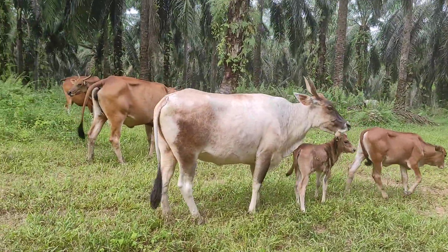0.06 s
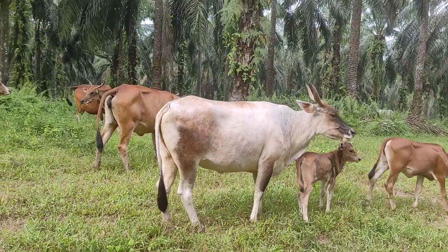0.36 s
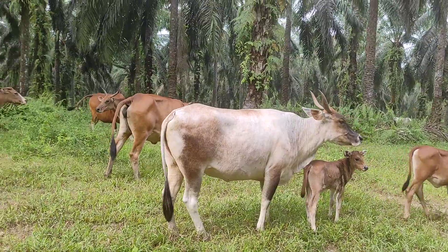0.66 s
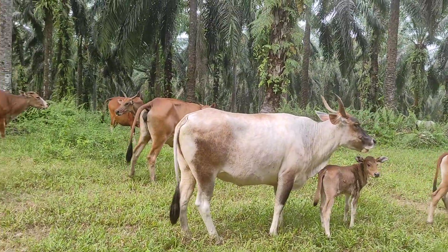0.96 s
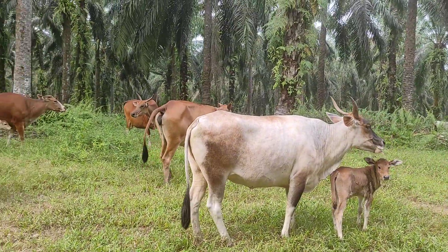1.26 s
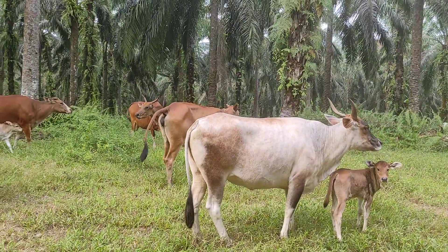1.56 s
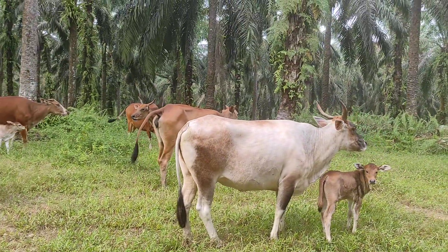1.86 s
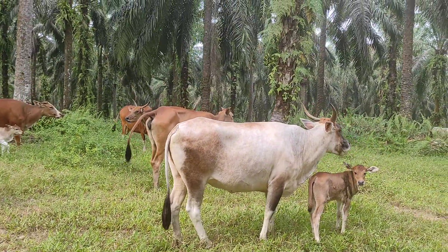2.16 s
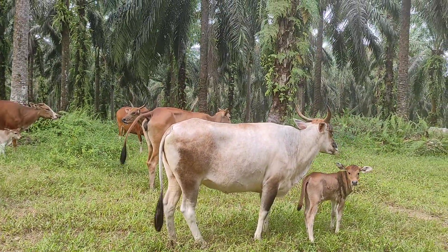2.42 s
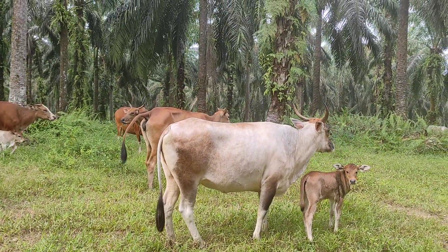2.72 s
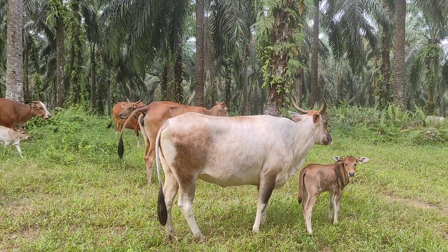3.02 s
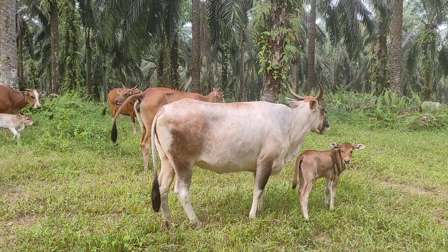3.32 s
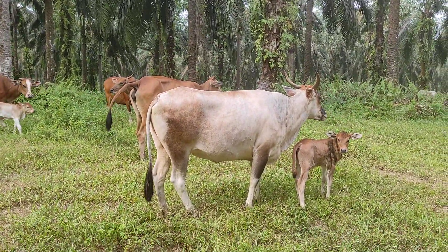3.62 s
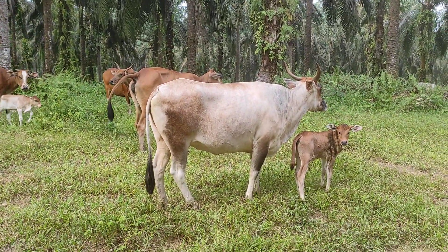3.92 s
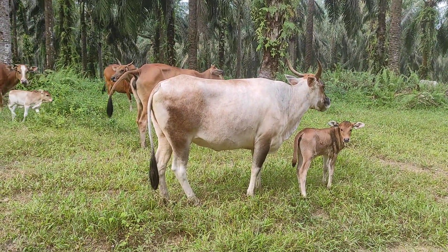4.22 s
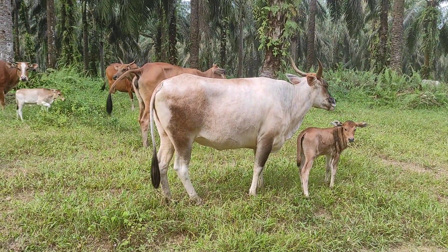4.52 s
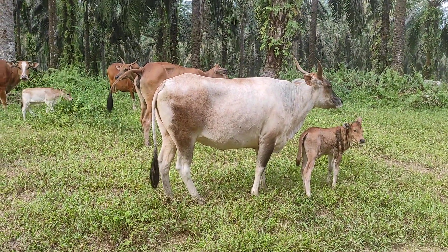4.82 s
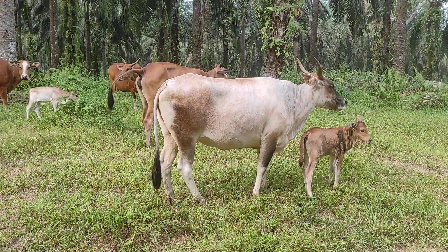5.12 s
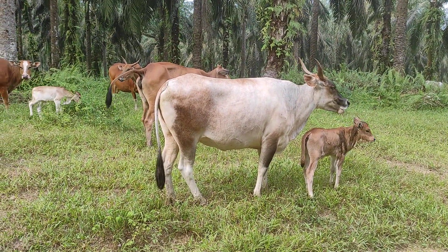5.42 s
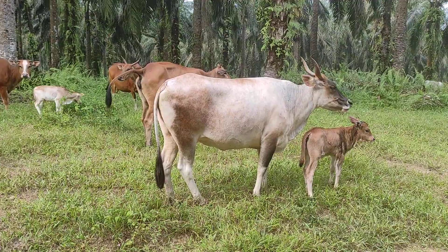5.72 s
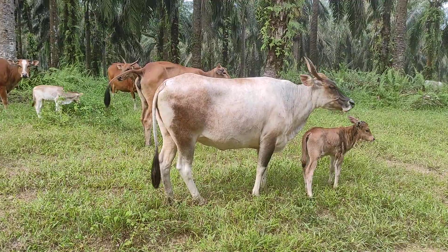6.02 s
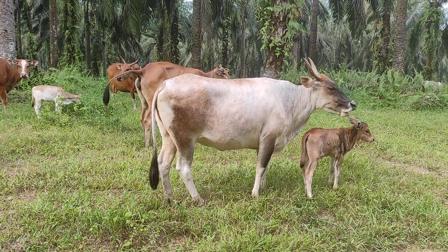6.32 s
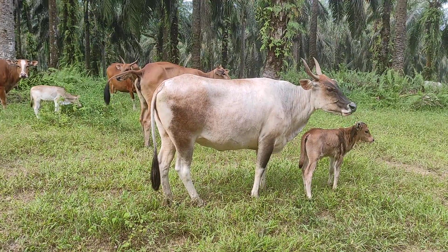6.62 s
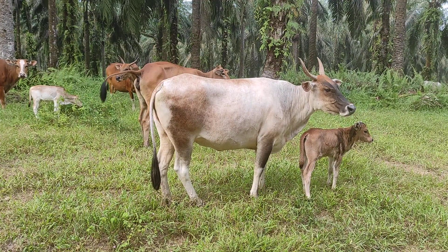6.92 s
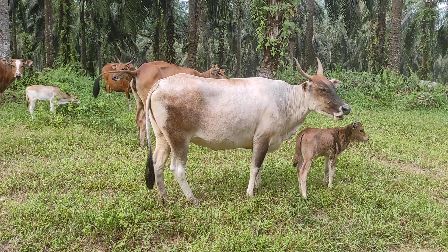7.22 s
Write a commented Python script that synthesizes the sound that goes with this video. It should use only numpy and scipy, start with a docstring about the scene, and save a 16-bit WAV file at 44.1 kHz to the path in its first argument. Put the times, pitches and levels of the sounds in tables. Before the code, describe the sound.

Hooves crunch through grass and a nearby cow lows once, then a faint distant animal answers over steady insects and birds.

```python
"""A cow lows close by: its vocal folds snap shut over and over, first humming through the nose, then ringing in
the open mouth for a long call that sinks into a creak. Around it, in a grassy clearing among palms, legs brush
the grass, hooves crush stems, the cow tears and chews grass, and there is one hollow thump. Far off another
animal answers. Insects shrill over a soft rumble, one bird calls at a steady pace and a farther one whistles.
The trunks send back an echo."""
import sys
import numpy as np
from scipy import signal
from scipy.fft import rfft, irfft, next_fast_len
from scipy.io import wavfile
from scipy.ndimage import uniform_filter1d, map_coordinates

SR = 44100
rng = np.random.default_rng(int(sys.argv[2]) if len(sys.argv) > 2 else 0)


def generate_wav(sig):
    """Save sig (samples, or channels by samples) to the path in sys.argv[1] as 16-bit PCM at SR."""
    pcm = np.round(np.clip(np.atleast_2d(sig).T, -1, 1) * 32767).astype(np.int16)
    wavfile.write(sys.argv[1], SR, pcm)


N = 325017
T = np.arange(N) / SR
SIZE = 2 * next_fast_len(N // 2 + SR // 2)      # leaves room for echoes
HZ = np.maximum(np.arange(SIZE // 2 + 1) * SR / SIZE, 1)

# how alike left and right are in spread-out noise: f/Hz, likeness (1 = the same)
STEREO_LIKENESS = [(60, 0.93), (250, 0.69), (1000, 0), (2500, 0), (5000, 0.017), (15000, 0)]
# tone colour of the outdoor rumble: f/Hz, level/dB
AIR_COLOUR = [(25, -2), (60, -2), (118, -7.5), (169, -1.5), (230, -7.5), (480, -15), (700, -17),
              (1270, -21), (2200, -17), (2900, -23.5), (4000, -23.5)]
# bands in which the insects shrill: f/Hz, width/Hz, level/dB, left minus right/dB
INSECT_BANDS = [(4650, 510, 7.5, -1.5), (5535, 880, 5.5, -5.5), (6740, 510, 4.5, -10.5),
                (7170, 930, -1.5, -13.5), (8580, 1080, -2, 18), (10850, 530, -11, -4),
                (13800, 1900, -21, -10)]
# legs sweeping through grass: t/s of the peak, half length/s, level/dB
LEG_SWEEPS = [(0.022, 0.012, -44.5), (0.082, 0.039, -48), (0.124, 0.034, -44.5), (0.31, 0.38, -50),
              (0.475, 0.031, -43), (0.63, 0.19, -50.5), (0.95, 0.11, -54), (1.134, 0.091, -48.5),
              (1.23, 0.025, -49), (1.303, 0.11, -50), (1.625, 0.5, -53.5), (1.966, 0.059, -48.5),
              (3.853, 0.13, -55), (4.223, 0.17, -54), (4.707, 0.12, -57.5), (5.1, 0.092, -58),
              (5.46, 0.11, -52.5), (7.015, 0.04, -57.5), (7.115, 0.043, -55)]
# tone colours of brushed grass and of breaking stems: f/Hz, level/dB
BLADE_COLOUR = [(200, -30), (500, -6), (1200, -6), (2400, -2), (3700, -5), (5000, -5.5), (7200, 7.5),
                (8900, 4), (9800, -8), (15500, -17)]
STEM_COLOUR = [(150, 16.5), (500, 19.5), (1000, 10), (2500, 9.5), (3800, -8), (5200, -4), (8000, 0.5),
               (10000, -16), (15500, -51)]
# hooves crushing stems, and from 3.8 s on mostly the cow tearing and chewing grass: t/s of the peak, fade/s,
# level/dB, treble tilt/(dB per octave), stem ring f/Hz
CRUNCHES = [(0.357, 0.0045, -46, 5.5, 2120), (.44, 0.0035, -53, 6, 1000), (.458, 0.01, -45, -0.5, 840),
            (0.478, 0.0039, -44.5, 2.5, 980), (0.488, 0.0058, -38, 4.5, 2630),
            (0.5403, 0.0022, -42, 5, 2100), (.552, 0.0025, -46.5, 1, 1300),
            (.557, 0.0022, -42.5, 3.5, 1210), (0.681, 0.0045, -49.5, 4, 1800),
            (0.919, 0.0045, -48, 7.5, 1980), (1.024, 0.004, -50.5, -1.5, 790),
            (1.102, 0.0041, -44, 1, 2260), (1.139, 0.0036, -42.5, 14, 3100),
            (1.275, 0.004, -42, 10, 7000), (1.32, 0.0038, -37.5, 5.5, 1250),
            (1.384, 0.0047, -50.5, 3.5, 1000), (1.58, 0.0043, -56, 3, 1490),
            (3.254, 0.0019, -34.5, 3, 2012), (3.845, .004, -51, 3, 2300), (4.096, 0.0035, -42, 8.5, 1696),
            (4.132, 0.012, -53, 5, 1970), (4.206, 0.0015, -42.5, 11, 2820),
            (4.254, 0.0042, -49.5, 1.5, 2400), (4.306, 0.0017, -50, 4, 2880),
            (4.404, 0.0057, -47.5, 5, 1680), (5.013, .003, -53, 3, 2000), (5.517, 0.0047, -51.5, 2, 2100),
            (5.841, 0.003, -51, 4.5, 1785), (6.196, .002, -51, 3.5, 1800),
            (6.84, 0.0026, -49, -1.5, 1500), (7.24, 0.0049, -52, 5, 2040)]
# dry stems cracking: t/s, level/dB before the tone is shaped
STEM_CRACKS = [(.3565, -38), (.459, -33), (.4875, -33), (.5145, -31), (1.1375, -35), (1.141, -36),
               (1.3205, -36), (4.0945, -39), (4.2055, -36), (5.4227, -38)]
# dull knocks: t/s, level/dB, f/Hz, fade/s, extra pitch at the start as a multiple of f
DULL_KNOCKS = [(.5145, -34.5, 800, .007, 3.2), (.6045, -38, 410, .014, 2.2), (.797, -51, 180, .07, 2),
               (1.317, -38.5, 480, .018, 2.2), (5.4238, -29.5, 290, .013, 1.1)]
# the cow's pitch, which stands for its effort and also steers its loudness: t/s, f/Hz
COW_PITCH = [(1.55, 72.5), (1.64, 78.2), (1.8, 86.47), (1.94, 88.3), (2.056, 87.86), (2.188, 85.57),
             (2.354, 84.9), (2.46, 85.96), (2.582, 83.5), (2.72, 82.9), (2.796, 80.75), (2.928, 78.87),
             (3.272, 66.98), (3.332, 63.68), (3.42, 58.76), (3.5, 46.42), (3.58, 39.98)]
# resonances (pitches at which the cow's airways ring): f/Hz, width/Hz, level/dB, left minus right/dB
NOSE_RESONANCES = [(88, 50, -6, 4), (170, 50, -4, 4), (470, 200, -9, 3), (700, 150, -13, 2),
                   (930, 130, -1.5, 0), (1160, 260, -4, -2), (2000, 200, -4, -3), (2380, 200, 0, -3),
                   (2790, 160, -1.5, -2), (3190, 150, -0.5, 0), (3740, 220, -10, 0), (4430, 220, -3.5, -2),
                   (4950, 400, -6, -4), (5400, 350, -7, -5), (6100, 420, -3.5, -6), (7050, 700, -5, -4),
                   (8500, 900, -12, 3)]
OPEN_MOUTH = [(91, 81, -18.5, 6), (204, 59, -9.5, 4), (390, 188, -17, 3.5), (792, 64.5, -2, -0.5),
              (910, 120, -13, 2), (1164, 153, 1.5, -1.5), (1318, 200, -1, -6), (1464, 126, 6.5, -4),
              (1640, 260, -4, -4), (2155, 420, -6.5, -7), (2397, 130, 0, -4.5), (2687, 64, -7.5, -11),
              (2813, 150, -2, 0.5), (3270, 310, -10, 1)]
NARROW_MOUTH = [(500, 180, -16.5, 5), (750, 62, -7, -2), (1210, 320, 1.5, -1), (1760, 130, -3, 0),
                (2114, 190, -8, -13), (2470, 310, -6.5, -5), (2850, 270, -6, 1)]
TIGHT_FOLD_RASP = [(4150, 450, -9, -1), (4880, 400, -6, -4), (5450, 420, -7, -9), (6200, 500, -13, -9),
                   (6900, 350, -4.5, -10), (7300, 400, 0, -10), (8130, 400, 1, 4), (8620, 480, -3, 11)]
SLACK_FOLD_RASP = [(3800, 600, -6, 6), (4930, 580, 3, -5), (5500, 470, 0, -10.5), (6150, 450, -1.5, -12),
                   (7100, 700, 1, -10), (7980, 600, 3.5, 12), (8750, 500, -0.5, -3), (10600, 1100, -9, 0)]
# how far the cow's sound wave is ahead on the right: f/Hz, lead/radians
RIGHT_LEAD = [(60, 0.04), (250, 0.39), (700, 0.97), (1500, 1.94), (2800, 1.41), (4000, 3.84), (6000, 3.97),
              (7500, 2.3), (8600, 2.22)]
# one bird call, never twice alike: t/s, relative chip level/dB, relative slur level/dB, fall/(Hz per s)
CHIP_CALLS = [(3.876, -56.5, -61.5, 2720), (4.452, -53, -63, 3300), (5.068, -52, -63, 2300),
              (5.672, -54.5, -63, 2210), (6.284, -54.5, -61.5, 2593)]
# the far answer: t/s of the middle, half length/s, top f/Hz, relative level/dB, hoarseness (0 to 1)
ANSWER_NOTES = [(4.24, 0.14, 626, -67, 0.31), (4.76, 0.39, 755, -64.5, 0.89)]
# the farther bird: t/s, half length/s, f/Hz, level/dB
FAR_WHISTLES = [(4.95, .07, 1940, -71), (5.56, .07, 2000, -68), (5.78, .06, 1970, -71),
                (6.1, .03, 2000, -64), (6.21, .03, 1920, -68), (6.6, .015, 1750, -67),
                (6.75, .015, 1780, -68), (6.82, .04, 1990, -67)]
# ringing tones of the hollow thump: f/Hz, level/dB, time to fade by 60 dB/s
THUMP_TONES = [(178, -36, .12), (210, -47, .24), (385, -46, .15), (580, -50, .13)]

# the course of the cow's call
HUM_STARTS_S, MOUTH_OPENS_S, SLACKENS_S, FULLY_SLACK_S = 1.53, 1.9995, 2.55, 3.33
MOUTH_NARROWS_S, RASP_ENDS_S, VOICE_ENDS_S, THROAT_ENDS_S = 3.44, 3.54, 3.592, 3.685
HUM_DB_PER_OCTAVE = 30      # with shut lips, the level climbs steeply with pitch


def from_db(db):
    """Turn decibels into a factor to multiply by."""
    return 10 ** (np.asarray(db) / 20)


def rms_one(x):
    """Scale a sound so that its average level (rms) is 1."""
    return x / np.sqrt(np.mean(x ** 2) + 1e-20)


def evened(x, size=2200):
    """Hold the level near 1, judged over stretches of `size` samples."""
    power = np.mean(np.atleast_2d(x) ** 2, axis=0)
    smooth_power = uniform_filter1d(uniform_filter1d(power, size=size), size=size)
    return x / np.sqrt(np.abs(smooth_power) + 1e-14)


def between(start, end, attack, release):
    """Fade in after start, and fade out before end."""
    return np.clip((T - start) / attack, 0, 1) * np.clip((end - T) / release, 0, 1)


def arch(centre, half_length):
    """A smooth swell and fade of height 1."""
    return np.exp(-np.minimum(((T - centre) / half_length) ** 2, 50))


def burst(start, fade_s):
    """A sudden jump to 1 that dies away."""
    return np.exp(-np.clip((T - start) / fade_s, 0, 50)) * (T > start)


def drift(per_s):
    """A random wobble of typical size 1 that heads for a new value per_s times a second."""
    points = rng.standard_normal(4000)
    return rms_one(np.interp(T * per_s, np.arange(len(points)), points))


def tone(hz, db):
    """A pure tone that follows the given pitch and level."""
    return np.sqrt(2) * from_db(db) * np.sin(2 * np.pi * np.cumsum(hz) / SR)


def at_hz(points):
    """Join a few points into a curve over all frequencies."""
    hz, value = np.transpose(points)
    return np.interp(np.log(HZ), np.log(hz), value)


def filtered(x, response):
    """Turn each frequency of a sound up or down as the response says."""
    return irfft(rfft(x, SIZE) * response, SIZE)[..., :N]


def resonance(hz, centre, width):
    """A response that is 1 at its centre and falls away on both sides."""
    return 1 / (1 + 1j * centre / width * (hz / centre - centre / hz)) ** 2


def resonances(rows):
    """Left and right response of a set of resonances; each swells before it rings out."""
    power = 1e-9
    for hz, width, db, pan in rows:
        sides = from_db([[db + pan / 2], [db - pan / 2]])
        power = power + sides ** 2 / (1 + (hz / width * (HZ / hz - hz / HZ)) ** 2) ** 2
    # find the quickest timing (phase) these peaks allow, then draw it out by a quarter
    cepstrum = irfft(np.log(power.mean(axis=0)) / 2)
    cepstrum[SIZE // 2:] = 0
    quickest_phase = 2 * rfft(cepstrum).imag
    return np.sqrt(power) * np.exp(1.25j * quickest_phase)


def blend(x, first, second, share, stretch):
    """Pass from one set of resonances to another at an even level; stretch slides them all in pitch."""
    clock, samples = np.cumsum(stretch), np.arange(N)
    warped = map_coordinates(x, [np.interp(samples, clock, samples)], order=3)

    def through(rows):
        """Filter, then undo the change of speed, so that only the resonances move."""
        sides = filtered(warped, resonances(rows))
        return evened(np.array([map_coordinates(side, [clock], order=3) for side in sides]))

    return evened(np.sqrt(1 - share) * through(first) + np.sqrt(share) * through(second))


def right_delayed(x, delay_s):
    """A sound from the left reaches the right side a little later."""
    return np.array([x, np.interp(T - delay_s, T, x)])


def stereo_noise():
    """Noise from all around: left and right are alike in the bass, unrelated in the treble."""
    mid, side = rng.standard_normal((2, N))
    alike = at_hz(STEREO_LIKENESS)
    return filtered(mid, np.sqrt(1 + alike)) + filtered(side, np.sqrt(1 - alike)) * [[1], [-1]]


def crackle(per_s, hiss, spread_db=2.5):
    """Stems snapping at random, over the smooth hiss of blades sliding."""
    sizes = from_db(spread_db * np.minimum(rng.exponential(1, (2, N)), 5)) * rng.choice([-1, 1], (2, N))
    snaps = sizes * (rng.random(N) < per_s / SR)
    return rms_one(rms_one(snaps) + hiss * rms_one(stereo_noise()))


def grove(x, t60=0.91, low_hz=500, dull_hz=3500):
    """Echo from trunks, fading 60 dB in t60 seconds: bass passes them by, leaves swallow the treble."""
    t = T[:SR]
    tail = rng.standard_normal((2, SR)) * from_db(-60 * t / t60) * np.minimum(t / 0.005, 1)
    response = rfft(rms_one(tail) / np.sqrt(SR), SIZE)
    return filtered(x, response / (1 + (HZ / dull_hz) ** 2) / (1 + (low_hz / HZ) ** 2))


def herd_stir(t):
    """How near and busy the herd is: 1 at first, sinking to 0."""
    return np.interp(t, [1.5, 5.5], [1, 0])


def air(level_db=-58.5, stir_db=1.0):
    """Soft outdoor rumble, stronger on the left, and a little fuller while the herd is moving."""
    lean_db = np.array([[4], [-4]]) / (1 + HZ / 400)
    colour = from_db(at_hz(AIR_COLOUR) + lean_db) / (1 + (HZ / 4500) ** 8)
    return from_db(level_db + stir_db * herd_stir(T)) * rms_one(filtered(stereo_noise(), colour))


def insects(level_db=-57):
    """A far chorus merges into steady bands of shrill noise."""
    chorus = rms_one(filtered(rng.standard_normal((2, N)), resonances(INSECT_BANDS)))
    return chorus * from_db(level_db + 0.51 * drift(18))


def cricket(level_db=-59, chirps_per_s=22.4, pitch_hz=4890, droop_hz=170):
    """A cricket strokes its wings twice and rests once; each stroke droops in pitch."""
    strokes = 3 * np.cumsum(chirps_per_s * (1 + .015 * drift(3))) / SR
    wing = np.sin(np.pi * strokes) ** 2 * (np.floor(strokes) % 3 < 2)
    hz = pitch_hz - droop_hz * (strokes % 1 - .5) + 60 * drift(400)
    chirp = wing * tone(hz, level_db + 1.8 * drift(40) + 1.2 * drift(3))
    return right_delayed(chirp, .00045) + 0.3 * grove(chirp)


def grass(rustle_db=-63.5):
    """Legs sweep through grass over a steady rustle; the level flickers as the blades catch."""
    sweep_power = sum((from_db(db) * arch(s, half)) ** 2 for s, half, db in LEG_SWEEPS)
    level = np.sqrt(from_db(rustle_db) ** 2 + sweep_power)
    catching = from_db(drift(30) + 1.3 * drift(250))
    blades = filtered(crackle(per_s=5000, hiss=1.0), from_db(at_hz(BLADE_COLOUR)))
    return level * catching * rms_one(blades)


def crunches(stereo_width=0.43):
    """Each step or bite is a crunch of small cracks that swells and dies; the crushed or torn stem rings
    briefly."""
    mid, side = crackle(per_s=1200, hiss=0.55)
    crunch = filtered(mid + stereo_width * side * [[1], [-1]], from_db(at_hz(STEM_COLOUR)))
    out = np.zeros((2, N))
    for s, fade, db, tilt, stem_hz in CRUNCHES:
        span = np.abs(T - s) < .12
        t = T[span] - s
        hz = np.maximum(np.fft.rfftfreq(len(t), 1 / SR), 100)
        colour = from_db(tilt * np.log2(hz)) * (1 + 1.3 * resonance(hz, stem_hz, width=400))
        swell = np.exp(-np.abs(t) / fade)
        step = irfft(rfft(crunch[:, span]) * colour, len(t)) * swell
        out[:, span] += from_db(db) * rms_one(step) * np.sqrt(np.mean(swell ** 2))
    return out


def cracks():
    """A dry stem gives way at once: a bright tick that is over within a millisecond or two."""
    ticks = sum(from_db(db) * burst(s, fade_s=.0005) for s, db in STEM_CRACKS)
    colour = from_db(at_hz(STEM_COLOUR)) * HZ ** 1.5
    return filtered(ticks * rng.standard_normal((2, N)), colour / colour.max())


def twigs(per_s=2.5, level_db=-61, spread_db=6, stir_db=6):
    """Stray twigs snap at random moments, louder while the herd is near."""
    snaps = np.zeros(N)
    for when, strength in rng.random((int(per_s * T[-1]), 2)):
        s = when * T[-1]
        db = level_db + spread_db * (strength - .5) + stir_db * herd_stir(s)
        snaps += from_db(db) * burst(s, fade_s=.0041)
    colour = from_db(at_hz(STEM_COLOUR)) * np.sqrt(HZ)
    return snaps * rms_one(filtered(rng.standard_normal(N), colour))


def knocks(droop_s=0.0011, thump_at_s=5.4287):
    """Soft impacts start bright and quickly droop in pitch; the last rings on as a hollow thump."""
    out = np.zeros(N)
    for s, db, hz, fade, droop in DULL_KNOCKS:
        t = np.clip(T - s, 0, 2 * fade)
        cycles = hz * (t + droop * droop_s * (1 - np.exp(-t / droop_s)))
        level = from_db(db - 60 * t / fade) * 20 * t / fade
        out += level * np.sin(2 * np.pi * cycles)
    for hz, db, t60 in THUMP_TONES:
        t = np.clip(T - thump_at_s, 0, 2 * t60)
        out += from_db(db - 60 * t / t60) * np.sin(2 * np.pi * hz * t)
    bass_cut = signal.butter(2, 130, "high", fs=SR, output="sos")
    return signal.sosfilt(bass_cut, out + 1e-18) * from_db([[2.5], [-2.5]])


def vocal_folds(pitch, slack, puff_peak_cycles=.1615):
    """The folds snap shut once a cycle and let a puff of air through; slack folds snap less evenly."""
    cycles = np.cumsum(pitch) / SR
    cycles -= np.interp(MOUTH_OPENS_S, T, cycles)      # one snap lands just as the lips part
    staircase = np.floor(cycles) + np.clip(cycles % 1 * SR / pitch, 0, 1)      # one step up per cycle
    snaps = np.diff(staircase, prepend=staircase[0])
    snaps = rms_one(snaps * from_db((.87 + .8 * slack) * drift(73)))
    puff_age = cycles % 1 / puff_peak_cycles
    puffs = rms_one(rng.standard_normal(N) * (.12 + puff_age * np.exp(1 - puff_age)))
    return cycles, snaps, puffs


def throat_boom(pitch, cycles, effort, shut, centre_hz=251.7, hz_per_octave=35.3, evening=.091):
    """The throat's lowest resonance lifts each overtone in turn as the pitch slides it through."""
    centre = centre_hz + hz_per_octave * effort
    boom = 0
    for k in range(2, 7):
        overtone = resonance(k * pitch, centre, width=60) * np.exp(2j * np.pi * k * cycles)
        boom = boom + np.sqrt(2) * overtone.real * 3 / k
    boom = (1 - evening) * boom + evening * evened(boom)
    db = -38 + 3 * effort + shut * (-17.5 + HUM_DB_PER_OCTAVE * effort)
    gate = between(HUM_STARTS_S, THROAT_ENDS_S, .035, release=.14)
    return boom * from_db(db) * gate * from_db([[2], [-2]])


def nose_hum(snaps, puffs, effort, level_db=-45):
    """The sound leaves by the nose until the lips part."""
    hum = evened(filtered(snaps + .22 * puffs, resonances(NOSE_RESONANCES)))
    gate = between(HUM_STARTS_S, MOUTH_OPENS_S + .02, .035, release=.035)
    return hum * from_db(level_db + HUM_DB_PER_OCTAVE * effort) * gate


def mouth_voice(snaps, puffs, effort, slack, shut, stretch, ring_hz=1446, hiss_above_hz=1700):
    """The open mouth rings with each snap, then narrows and muffles the last few into a creak."""
    narrow = np.maximum(shut, np.clip((T - MOUTH_NARROWS_S) / .02, 0, 1))
    # the puffs hiss mostly above the strongest resonance, so it rings cleanly between snaps
    hiss = filtered(puffs, .35 + .65 / (1 + (hiss_above_hz / HZ) ** 8))
    breathiness = .36 + .25 * slack + .3 * slack * narrow
    voice = blend(snaps + breathiness * hiss, OPEN_MOUTH, NARROW_MOUTH, narrow, stretch)
    ring = evened(filtered(voice, resonance(HZ, ring_hz, width=75)), size=700)
    voice += ring * (.2 + .22 * slack) * (1 - narrow)
    gate = between(MOUTH_OPENS_S - .001, VOICE_ENDS_S, .002, release=.081)
    return voice * from_db(-31.5 + 5.5 * effort - 2 * narrow) * gate


def rasp(snaps, puffs, slack, stretch, level_db=-45, growth_db=3.5):
    """A high rasp from snaps and puffs grows and broadens as the folds slacken."""
    buzz = blend(snaps + puffs, TIGHT_FOLD_RASP, SLACK_FOLD_RASP, slack, stretch)
    db = level_db + np.interp(T, [MOUTH_OPENS_S, FULLY_SLACK_S], [0, growth_db])
    return buzz * from_db(db) * between(MOUTH_OPENS_S - .001, RASP_ENDS_S, .0019, release=.06)


def cow(full_effort_hz=85, lips_part_s=.027, swell_db=1.3):
    """The beating vocal folds make throat, nose and mouth ring together as one long low."""
    pitch = np.interp(T, *np.transpose(COW_PITCH))
    effort = np.log2(pitch / full_effort_hz)      # in octaves; below 0 as the pitch sinks
    slack = np.interp(T, [SLACKENS_S, FULLY_SLACK_S], [0, 1]) ** 2
    pitch *= 1 + (.0025 + .005 * slack) * drift(70) + .001 * drift(12)
    cycles, snaps, puffs = vocal_folds(pitch, slack)
    shut = np.exp(-np.maximum(T - MOUTH_OPENS_S, 0) / lips_part_s)      # 1 = lips shut, 0 = open
    # the mouth's resonances sink with the effort, and wander because the jaw is never quite still
    stretch = 1 + .022 * effort + .003 * drift(4)
    mouth = mouth_voice(snaps, puffs, effort, slack, shut, stretch) + rasp(snaps, puffs, slack, stretch)
    mouth *= from_db(swell_db * arch(2.94, .17))      # one more swell before the call sinks
    call = throat_boom(pitch, cycles, effort, shut) + nose_hum(snaps, puffs, effort) + mouth
    return filtered(call, np.exp(.5j * at_hz(RIGHT_LEAD) * [[-1], [1]]))


def bird(pitch_hz=2600.0, chip_drop_hz=130, chip_peak_s=.006, slur_peak_s=.09):
    """Each call is a sharp chip, then a slur: a husky note that slides down in pitch."""
    hz, chips, slurs = np.full(N, pitch_hz), 0, 0
    for s, chip_db, slur_db, fall in CHIP_CALLS:
        since = np.maximum(T - s, 0)
        chip_drop = chip_drop_hz * np.exp(-since / chip_peak_s)
        glide = pitch_hz + chip_drop - fall * np.minimum(since, 2 * slur_peak_s)
        husky = np.clip(1.5 * since, .01, .07)
        hz = np.where(T >= s, glide * (1 + husky * drift(600)), hz)
        chips = chips + from_db(chip_db) * arch(s + chip_peak_s, .74 * chip_peak_s)
        slurs = slurs + from_db(slur_db) * arch(s + slur_peak_s, .92 * slur_peak_s)
    whistle = tone(hz, 0)
    echo = grove((1.1 * chips + 1.4 * slurs) * whistle, t60=.55)
    return (chips + .7 * slurs) * whistle + echo


def far_answer(sag=.26, waver_hz=115, flutter_db=3):
    """Only a far call's strongest tone gets through the trees, fluttering and breaking up at its top."""
    call = 0
    for s, half, top_hz, db, hoarse in ANSWER_NOTES:
        height = arch(s, .22)
        hz = top_hz * (1 - sag * (1 - height)) + waver_hz * hoarse * height * drift(220)
        swell = arch(s, half) * between(s - 1.4 * half, s + half, .042, release=.063)
        call = call + tone(hz, db + flutter_db * drift(25)) * swell
    return .62 * call + grove(call, t60=.79)


def far_bird(echo_db=4.5, waver=.02):
    """Soft, level whistles come from deep in the grove, off to one side."""
    song = sum(arch(s, half) * tone(hz * (1 + waver * drift(120)), db)
               for s, half, hz, db in FAR_WHISTLES)
    return right_delayed(song, .00017) + from_db(echo_db) * grove(song, t60=.7)


def scene(scatter_db=-10, echo_db=-13):
    """Near sounds bounce off herd and ground and echo from the palms, over the life of the plantation."""
    near = cow() + crunches() + cracks() + twigs() + knocks()
    scatter = from_db(scatter_db) * grove(near, t60=.13, low_hz=900, dull_hz=6000)
    echo = from_db(echo_db) * grove(near, t60=.95, low_hz=400)
    around = grass() + far_answer() + bird() + far_bird() + insects() + cricket() + air()
    return near + scatter + echo + around


def record(dry, cutoff_hz=15750):
    """The highest treble is cut off steeply."""
    return signal.sosfilt(signal.ellip(10, .1, 80, cutoff_hz, fs=SR, output="sos"), dry)


dry = scene()
out = record(dry)
generate_wav(out)
```